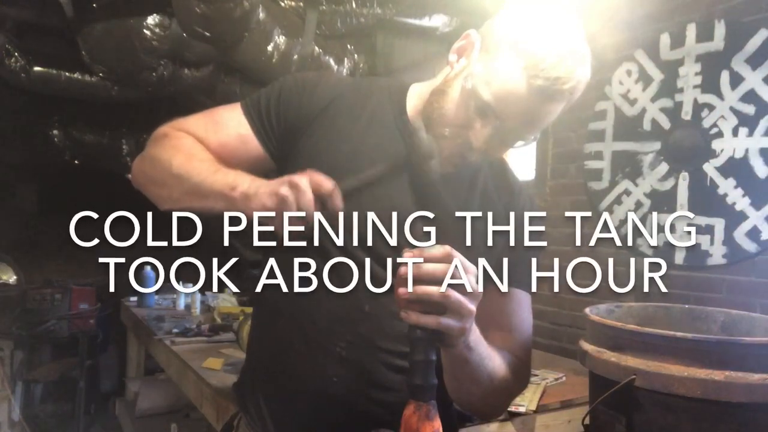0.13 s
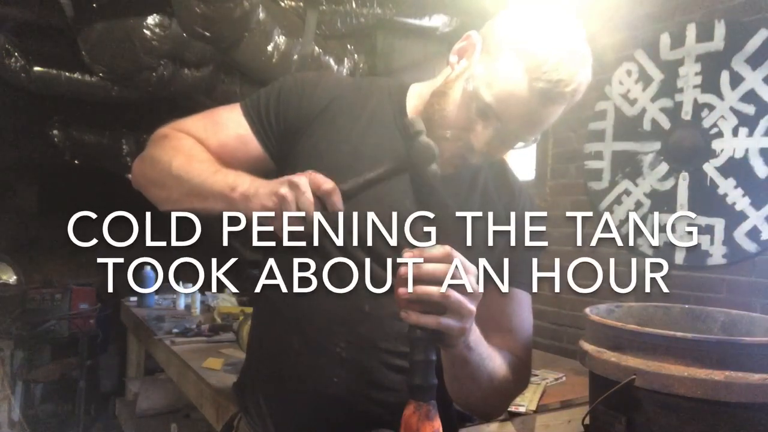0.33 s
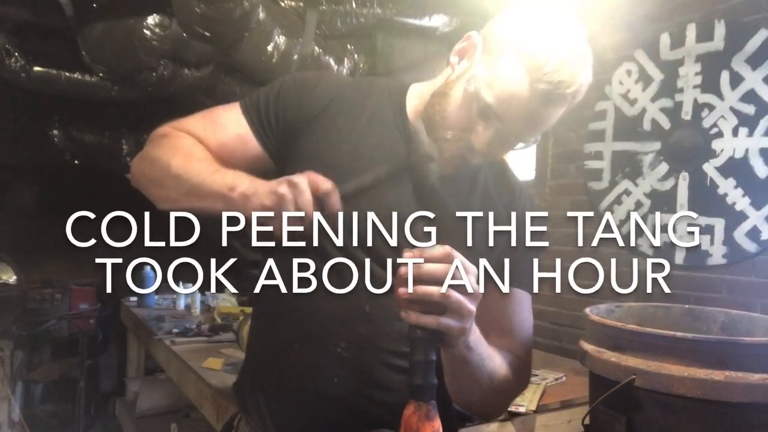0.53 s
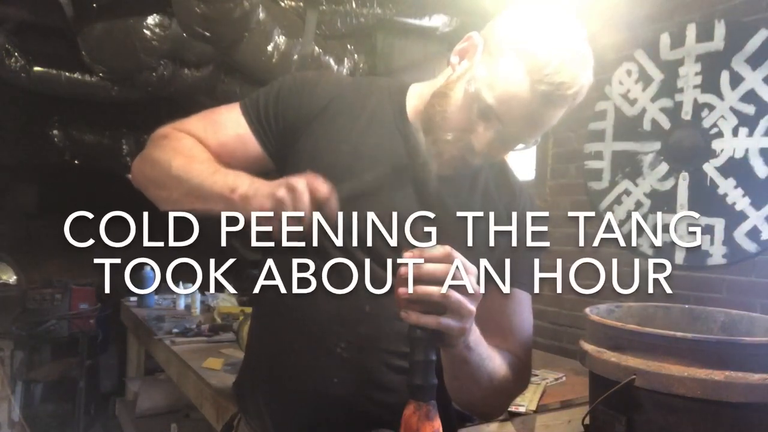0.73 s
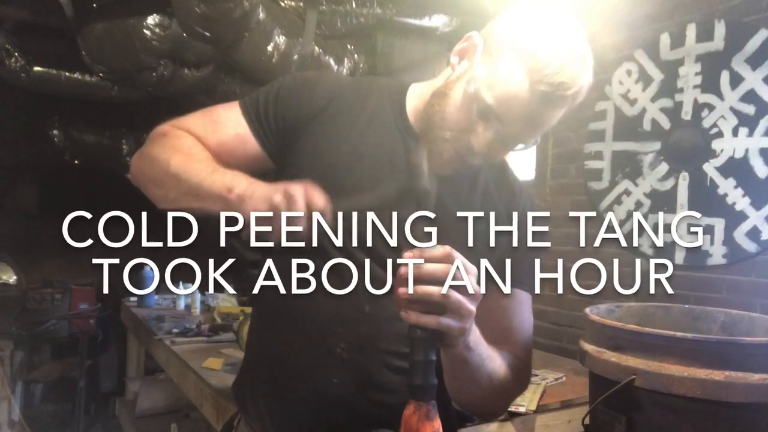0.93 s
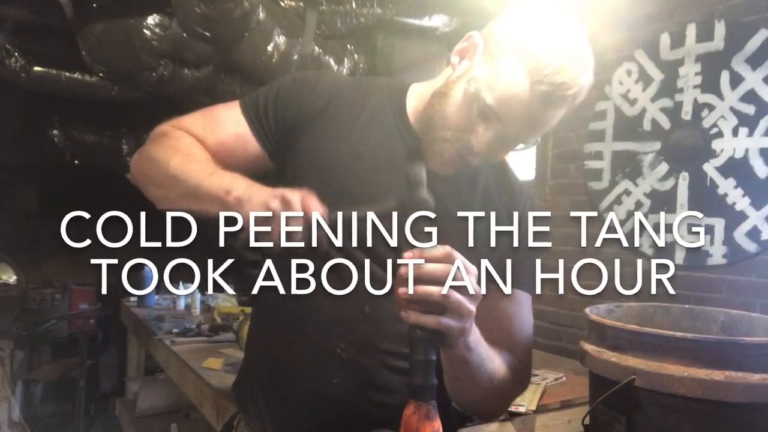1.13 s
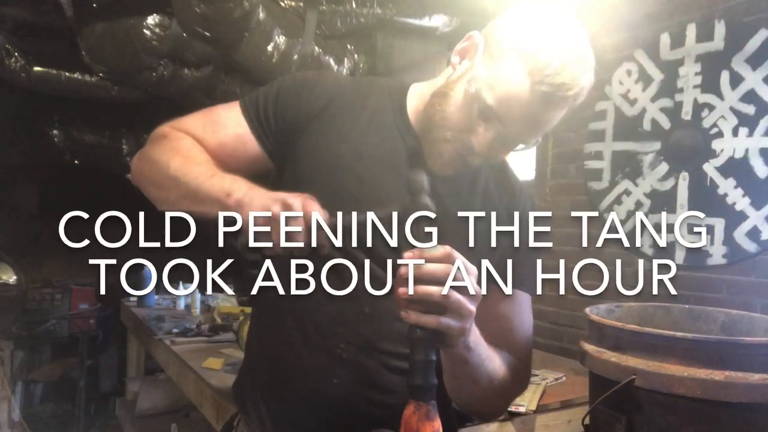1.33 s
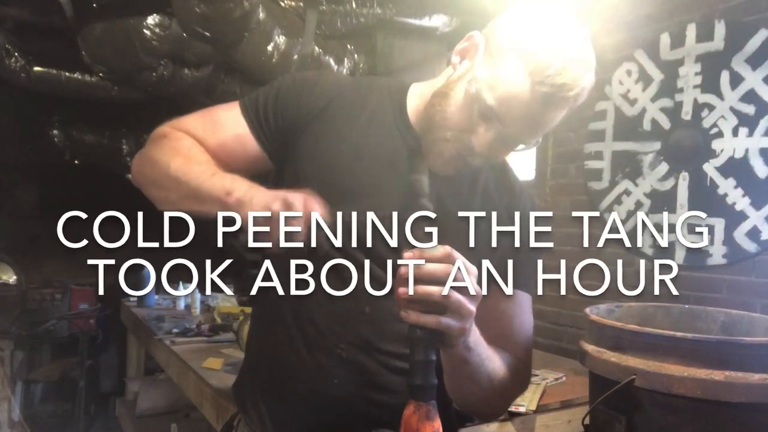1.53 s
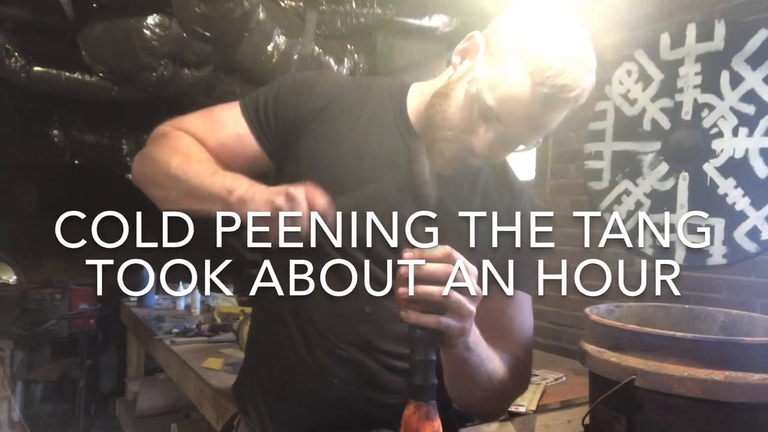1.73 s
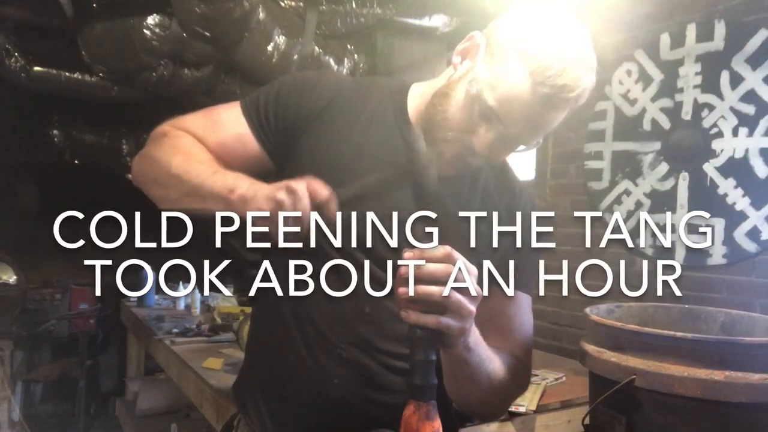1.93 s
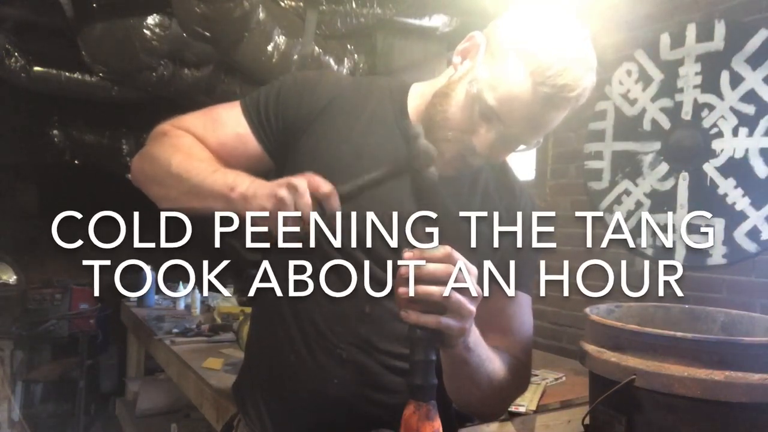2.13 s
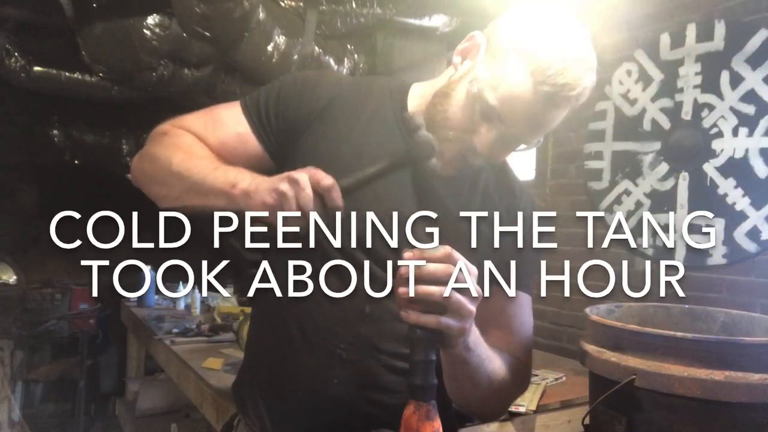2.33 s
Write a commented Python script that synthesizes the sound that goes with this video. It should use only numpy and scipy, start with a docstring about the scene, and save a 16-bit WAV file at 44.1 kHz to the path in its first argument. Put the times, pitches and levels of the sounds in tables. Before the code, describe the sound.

Steady, nearly identical hammer blows on steel, heard close in mono: crisp crack, short wooden knock beneath, faint singing metal and a short room tail, over very quiet low room noise.

```python
"""Small workshop, microphone close to the bench: a small hammer peens a steel tang in quick even blows.
Low steady room noise, made as coloured noise, runs throughout; at the start an earlier blow still rings.
Then come eleven blows, near twins, as the same steel is struck the same way: each has a faint tick ahead,
a sharp pressure pulse with a bright clack (damped sines) and a noise crack, then the wooden support's thump,
the blade's faint singing and the room's decaying noise tail, and last a late soft thud."""
import sys
import numpy as np
from scipy import signal
from scipy.fft import rfft, irfft, next_fast_len
from scipy.io import wavfile

SR = 44100
rng = np.random.default_rng(int(sys.argv[2]) if len(sys.argv) > 2 else 0)


def field_ratio(decibels):
    """Amplitude ratio for a level in dB (20 dB per decade); scalars and array-likes work."""
    return 10 ** (np.asarray(decibels, dtype=float) / 20)


def inscribe(sig):
    """Save sig as 16-bit PCM at rate SR to the path in sys.argv[1].

    A 1-D sig is mono; a 2-D sig holds one channel per row.
    Samples are clipped to [-1, 1] before scaling.
    """
    pcm = np.round(np.clip(np.atleast_2d(sig).T, -1, 1) * 32767)
    wavfile.write(sys.argv[1], SR, pcm.astype(np.int16))


N = 108838
SPAN = SR * 3 // 4  # samples computed for each blow

# Levels below are relative; rise is the time constant of a soft start, t60 the time to fall 60 dB.
# Blows: (time [s], level [dB], hardness as treble tilt [dB per octave], level of the high rings [dB])
BLOWS = [(.2011, -8.5, 1.8, 0), (.4290, -9, 1.7, 1), (0.6475, -8.5, 2.5, -7), (0.8844, -8.5, 1.56, -1),
         (1.1052, -8.5, 0.5, 9), (1.3343, -8, 1.3, 4.5), (1.549, -8.5, 1.35, 4.5), (1.7692, -9, 1.3, 3.5),
         (1.9913, -9.5, 0.3, 2), (2.2106, -9.5, 0.4, 9), (2.4347, -9, 1.5, 5)]
# The blow still ringing at the start, struck before time zero: same columns as BLOWS
EARLIER_BLOWS = [(-.024, -7.5, 0, -8)]
BLOW_GAIN_DB = 9  # added to every blow level
SCATTER_DB = 0.8  # usual spread of each mode's level from blow to blow

# First contact
SNAP_DB, SNAP_S = -7.5, 0.00006  # pulse level, pulse width scale
# Modes of hammer head and tang: (frequency [Hz])
CLACK_HZ = [1900, 2400, 2760, 3085, 3520, 3790, 4560, 4900, 5850, 6250, 8400, 9250, 10890, 12900]
# The same modes, a row for each: (level [dB], t60 [s], rise [s])
CLACK_MODES = [(-4, 0.012, 0.00029), (-16.5, 0.027, 0.00013), (0.5, 0.015, 0.00054), (2.5, 0.013, 0.00063),
               (-2.5, 0.012, 0.0007), (-8.5, 0.018, .0004), (-9, 0.0087, .0004), (-22.5, 0.04, 0.00013),
               (-13.5, 0.013, 0.00048), (-15.5, 0.015, 0.00025), (-22.5, 0.0095, 0.00066),
               (-17.5, 0.014, 0.0018), (-37, 0.012, .001), (-23, .015, 0.0028)]
CLACK_DB = -2.5
# Spectrum of the noise crack: (frequency [Hz], density [dB per Hz])
CRACK_SPECTRUM = [(1500, -40.5), (3500, 4.5), (6000, 1), (10000, -7.5), (13000, -13.5), (15000, -17.5),
                  (16500, -40)]
CRACK_DB, CRACK_T60_S = -25, 0.036
TICK_DB, TICK_LEAD_S = -46.5, 0.0225
TICK_TILT_DB, TICK_SCATTER_DB = -4, 1.5  # tilt per octave; spread

# Modes of the wooden support: (frequency [Hz])
WOOD_HZ = [62, 165, 278, 310, 397, 424, 491, 567, 619, 860, 879, 990, 1055, 1095, 1140, 1187, 1230, 1273,
           1345, 1410]
# The same modes, a row for each: (level [dB], t60 [s], rise [s])
WOOD_MODES = [(-20.5, 0.59, 0.079), (-19, 0.18, 0.0033), (-3.5, 0.21, 0.0069), (-10, 0.1, .01),
              (-2.5, .22, 0.035), (-6.5, 0.16, 0.015), (-13.5, 0.35, 0.014), (-6.5, 0.13, 0.012),
              (-5, 0.13, 0.0017), (-4.5, 0.12, .003), (5.5, .08, 0.009), (-7.5, 0.13, .003),
              (1, 0.034, .003), (3, 0.027, 0.001), (-0.5, 0.11, 0.015), (9, 0.032, 0.0028),
              (-13.5, 0.067, .005), (-20, 0.3, .003), (-3.5, 0.053, 0.0024), (-7, 0.04, 0.001)]
WOOD_DB, WOOD_LAG_S = -18.5, 0.00303

# Modes of the blade: (frequency [Hz])
BLADE_HZ = [129, 806, 906, 1117, 1227, 1333, 1820, 2326, 2836, 3336, 3844]
# The same modes, a row for each: (level [dB], t60 [s], rise [s])
BLADE_MODES = [(-6, 0.84, 0.024), (-10.5, 1, .012), (-8.5, 1.1, 0.01), (5.5, 0.26, .01), (7, 0.26, .01),
               (-20, 0.42, 0.011), (-20.5, 1.5, .01), (-12.5, 1.1, .01), (-5, 0.47, .01), (-34, .5, .01),
               (-8, .24, .008)]
BLADE_DB = -39.5
# High rings of the steel that change from blow to blow: (frequency [Hz])
WHINE_HZ = [5920, 7935, 8350, 10890, 11850]
# The same rings, a row for each: (level [dB], t60 [s], rise [s])
WHINE_MODES = [(-51, .15, .004), (-48, .13, .004), (-44, .085, .003), (-52, .09, .004), (-55, .11, .004)]
WHINE_SCATTER_DB = 2.5
# Dense ring of the tang in its mount: (frequency [Hz], level [dB], t60 [s])
CLANG_MODES = [(2300, -26.5, 0.41), (2519, -14, 0.3), (2620, -3, 0.065), (2785, -9.5, 0.14),
               (2880, -4, 0.19), (3080, -7, 0.28), (3090, -5.5, 0.14), (3230, -8, 0.26), (3370, -7.5, 0.18),
               (3640, -5, 0.2), (3780, -12, 0.074), (4050, -30.5, 0.15)]
CLANG_DB, CLANG_RISE_S = -33, 0.006

# Modes of the late soft thud: (frequency [Hz])
THUD_HZ = [255, 295, 400]
# The same modes, a row for each: (level [dB], t60 [s], rise [s])
THUD_MODES = [(8.5, 0.073, 0.0146), (-3.5, 0.13, 0.0067), (-27, .1, 0.0073)]
THUD_DB, THUD_LAG_S = -41, 0.124

# Early decay of the room: (frequency [Hz], t60 [s])
ROOM_T60 = [(100, 0.83), (400, 0.2), (1100, .25), (2900, 0.16), (7000, 0.14), (14000, 0.12)]
# Weaker, slower decay of the room: (frequency [Hz], t60 [s])
LATE_T60 = [(200, 0.72), (1000, 1), (3000, 0.72), (8000, .3)]
LATE_DB = -31
# Spectrum of the room's answer: (frequency [Hz], density [dB per Hz])
ROOM_SPECTRUM = [(60, -56.5), (150, -22), (215, -17), (300, -3), (600, -13), (760, -13.5), (900, -10.5),
                 (1150, -6), (1600, -15), (2100, -19), (2600, -12.5), (3000, -5.5), (3600, -15),
                 (5000, -21.5), (6000, -18), (8000, -36), (12000, -39.5), (16000, -44.5)]
ROOM_DB, ROOM_LAG_S, ROOM_RISE_S = -21, 0.004, 0.0013
ROOM_FRESH = 0.08  # share of the tail's power that differs per blow
# Step down some way into the wood's ring and the early room tail
DAMP_DB, DAMP_S, DAMP_FALL_S = -10, 0.093, 0.004  # depth, midpoint, time scale
DAMP_HZ = 1600  # in the room the step fades out above this

# Spectrum of the steady room noise: (frequency [Hz], density [dB per Hz])
AIR_SPECTRUM = [(25, -32.5), (45, -16.5), (70, -5), (150, 0), (300, -15), (650, -10.5), (1100, -17),
                (1500, -38), (2100, -38), (3000, -30), (6000, -35.5), (12000, -50), (16000, -52.5)]
AIR_DB = -54.5  # rms at the microphone

MIC_LOW_HZ, MIC_TOP_HZ = 41, 15800


def along(points, hz):
    """Reads (frequency [Hz], value) points on a log frequency axis."""
    f, v = np.transpose(points)
    return np.interp(np.log(hz + 1), np.log(f + 1), v)


def coloured(x, points):
    """Shapes noise by a spectrum and sets its rms to 1."""
    size = next_fast_len(len(x) + 8192)
    gain = field_ratio(along(points, np.fft.rfftfreq(size, 1 / SR)))
    y = irfft(rfft(x, size) * gain, size)[:len(x)]
    return y / np.sqrt(np.mean(y ** 2))


def ring(hz, modes, lag_s=0, tilt_db=0, scatter_db=SCATTER_DB):
    """Sums damped sines with a soft start; each mode's level varies from blow to blow."""
    hz = np.c_[hz]
    db, t60, rise = np.transpose(modes)[:, :, None]
    t = np.maximum(np.arange(SPAN) / SR - lag_s, 0)
    scatter = scatter_db * rng.standard_normal(hz.shape)
    tilt = tilt_db * np.log2(hz / 3000)  # per octave from 3 kHz
    envelope = field_ratio(db + scatter + tilt - 60 * t / t60) * (1 - np.exp(-t / rise))
    return (envelope * np.sin(2 * np.pi * hz * t)).sum(0)


def damp(t):
    """Gives the smooth step down in level [dB] some way into a ring."""
    return DAMP_DB / (1 + np.exp(np.clip((DAMP_S - t) / DAMP_FALL_S, -50, 50)))


def hammer():
    """Places every blow: a tick ahead, then contact, wood, steel, thud and the room's answer together."""
    out = np.zeros(N + 2 * SR)  # one spare second at either end
    shared_tail = room_tail()
    for time_s, db, tilt_db, whine_db in EARLIER_BLOWS + BLOWS:
        blow = snap(tilt_db) + clack(tilt_db) + crack(tilt_db)
        blow = blow + wood() + steel(whine_db) + thud() + room_answer(shared_tail)
        gain = field_ratio(db + BLOW_GAIN_DB)
        out[round((time_s + 1) * SR):][:SPAN] += gain * blow
        out[round((time_s + 1 - TICK_LEAD_S) * SR):][:SPAN] += gain * tick()
    return out[SR:SR + N]


def snap(tilt_db):
    """The first contact: one sharp pressure pulse, stronger for a harder blow."""
    u = np.arange(SPAN) / SR / SNAP_S - 2
    return field_ratio(SNAP_DB + 2 * tilt_db) * (u * u - 1) * np.exp(-u * u / 2)


def clack(tilt_db):
    """Short modes of hammer head and tang, with more treble for a harder blow."""
    return field_ratio(CLACK_DB) * ring(CLACK_HZ, CLACK_MODES, tilt_db=tilt_db)


def crack(tilt_db):
    """A burst of bright noise that dies exponentially, stronger for a harder blow."""
    t = np.arange(SPAN) / SR
    envelope = field_ratio(CRACK_DB + 2 * tilt_db - 60 * t / CRACK_T60_S)
    return envelope * coloured(rng.standard_normal(SPAN), CRACK_SPECTRUM)


def tick():
    """A faint, duller clack heard ahead of the blow, from the same modes."""
    level = field_ratio(TICK_DB + TICK_SCATTER_DB * rng.standard_normal())
    return level * ring(CLACK_HZ, CLACK_MODES, tilt_db=TICK_TILT_DB, scatter_db=TICK_SCATTER_DB)


def wood():
    """The thumped wooden support: low modes that start just after contact and later step down."""
    t = np.arange(SPAN) / SR
    return field_ratio(WOOD_DB + damp(t)) * ring(WOOD_HZ, WOOD_MODES, WOOD_LAG_S)


def steel(whine_db):
    """The singing steel: long blade modes, changeable high rings and the tang's dense ring in its mount."""
    blade = field_ratio(BLADE_DB) * ring(BLADE_HZ, BLADE_MODES)
    whine = field_ratio(whine_db) * ring(WHINE_HZ, WHINE_MODES, scatter_db=WHINE_SCATTER_DB)
    clang_hz = [mode[0] for mode in CLANG_MODES]
    clang_modes = [(*mode[1:], CLANG_RISE_S) for mode in CLANG_MODES]
    return blade + whine + field_ratio(CLANG_DB) * ring(clang_hz, clang_modes)


def thud():
    """A late soft thud of a few low damped modes."""
    return field_ratio(THUD_DB) * ring(THUD_HZ, THUD_MODES, THUD_LAG_S)


def room_tail():
    """Room reverberation: coloured noise in which each frequency dies at its own two speeds."""
    noise = coloured(rng.standard_normal(SPAN), ROOM_SPECTRUM)
    hz, t, z = signal.stft(noise, SR, nperseg=256)
    hz = hz[:, None]
    step_db = damp(t) / (1 + (hz / DAMP_HZ) ** 4)
    early = field_ratio(-60 * t / along(ROOM_T60, hz) + step_db)
    late = field_ratio(LATE_DB - 60 * t / along(LATE_T60, hz))
    decayed = signal.istft(z * np.hypot(early, late), SR, nperseg=256)[1][:SPAN]
    t = np.maximum(np.arange(SPAN) / SR - ROOM_LAG_S, 0)
    return decayed * (1 - np.exp(-t / ROOM_RISE_S))


def room_answer(shared_tail):
    """The room's answer to one blow: mostly a tail common to all blows, with a little of its own."""
    return field_ratio(ROOM_DB) * (np.sqrt(1 - ROOM_FRESH) * shared_tail + np.sqrt(ROOM_FRESH) * room_tail())


def workshop():
    """Low steady room noise, shaped by its spectrum."""
    return field_ratio(AIR_DB) * coloured(rng.standard_normal(N), AIR_SPECTRUM)


def scene():
    """Close hammer work over the workshop's room noise, in mono."""
    return (hammer() + workshop())[None]


def roll_off(x):
    """The treble ends steeply here."""
    return signal.sosfilt(signal.butter(12, 16530, fs=SR, output="sos"), x)


def record(dry):
    """The microphone passes a limited band, with a steep edge at the bottom and a steeper one on top."""
    low_edge = signal.butter(4, MIC_LOW_HZ, "high", fs=SR, output="sos")
    top_edge = signal.butter(8, MIC_TOP_HZ, fs=SR, output="sos")
    mix = signal.sosfilt(np.vstack([low_edge, top_edge]), dry)
    return roll_off(mix)


dry = scene()
out = record(dry)
inscribe(out)
```